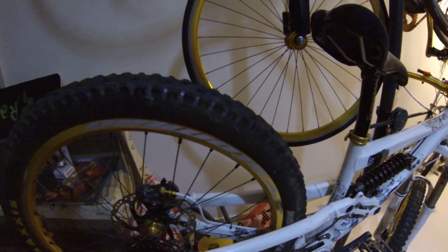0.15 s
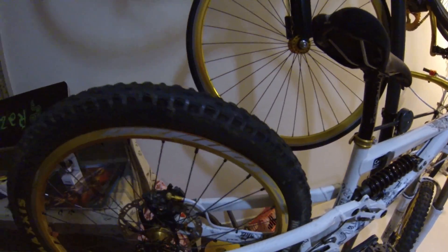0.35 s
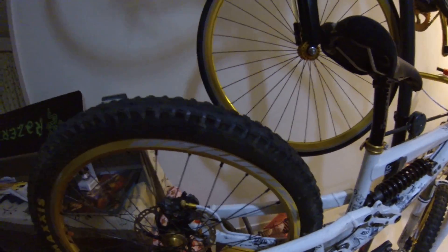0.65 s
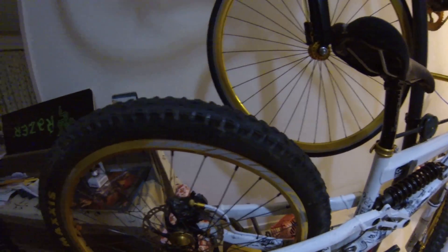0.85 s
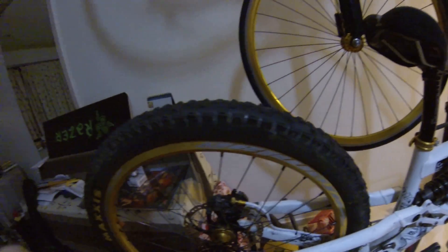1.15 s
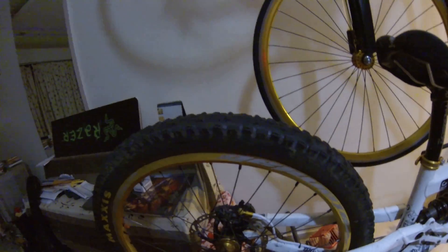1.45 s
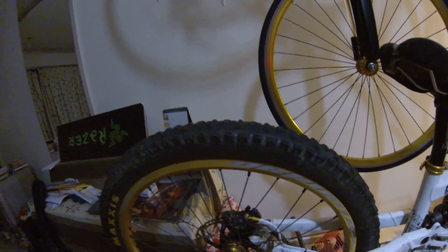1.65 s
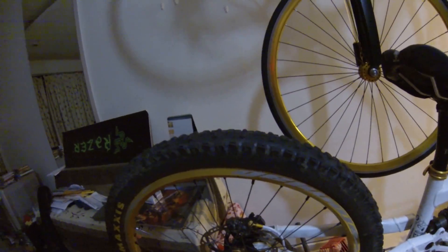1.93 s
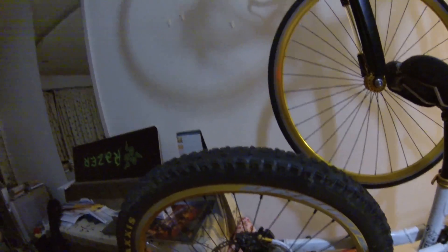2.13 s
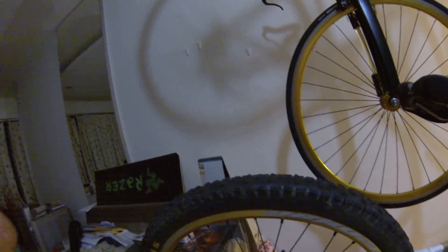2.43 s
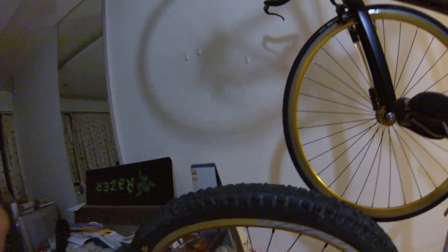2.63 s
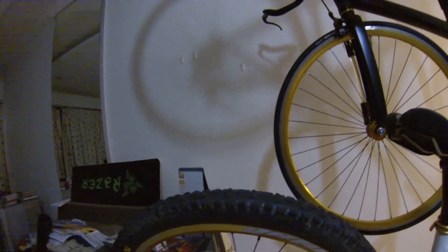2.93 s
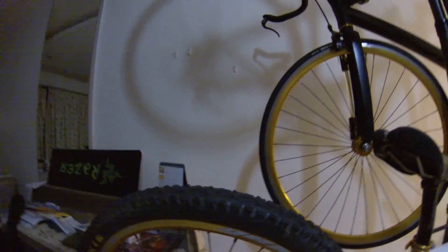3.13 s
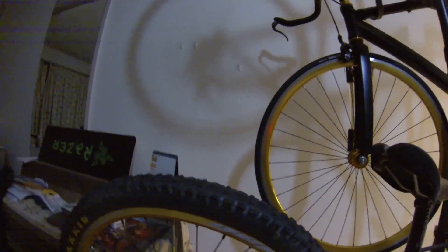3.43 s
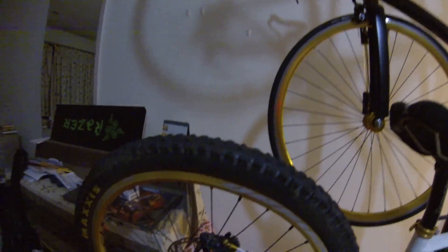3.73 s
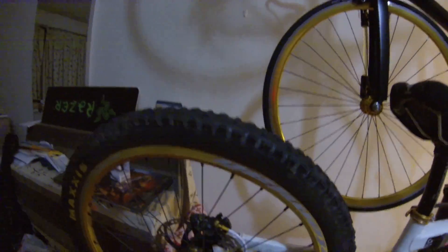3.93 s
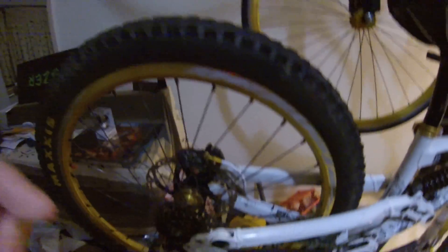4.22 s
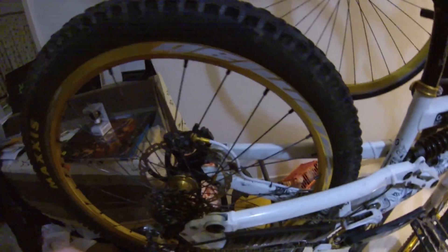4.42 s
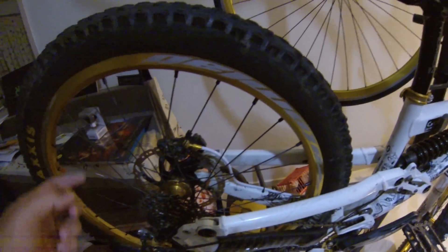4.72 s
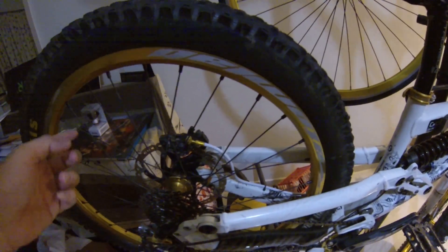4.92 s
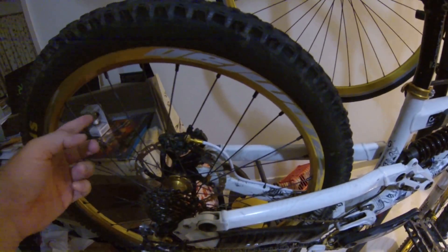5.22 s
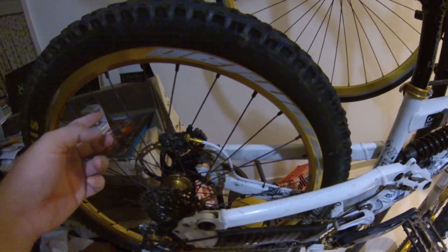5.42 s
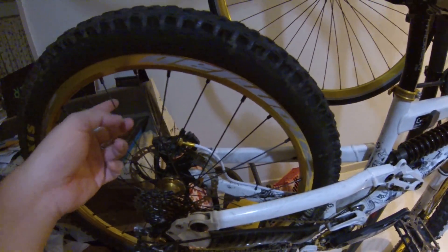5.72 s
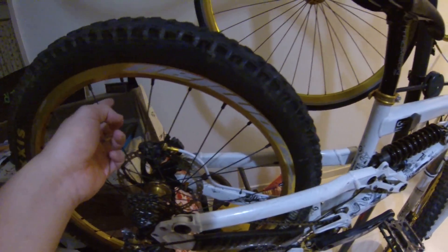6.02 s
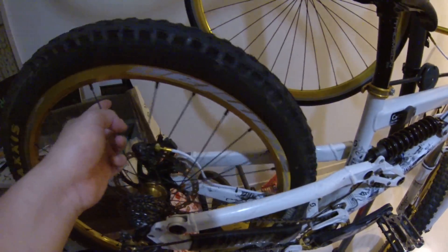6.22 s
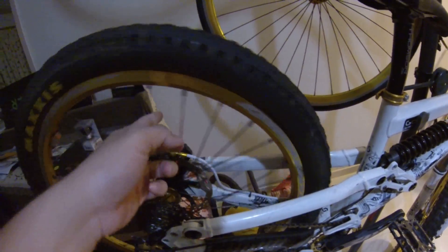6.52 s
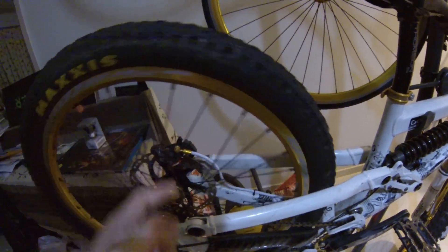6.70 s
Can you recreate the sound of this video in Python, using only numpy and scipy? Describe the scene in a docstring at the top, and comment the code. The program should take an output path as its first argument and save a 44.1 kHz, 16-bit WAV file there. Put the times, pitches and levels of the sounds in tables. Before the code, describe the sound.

A low room rumble and faint microphone hiss open the scene. A creeping bicycle wheel gives one metallic hub click at the start and a quick pair near 1.2 seconds, when a thin, very faint electrical pipping joins. Fingers softly knock and rub on the microphone housing from 0.3 seconds, with a stronger dull bump at 1.3. Sharper plastic knocks and scrapes cluster between 2.6 and 3.3 seconds, followed by a hard knock with a low thump at 3.6 and lighter taps near 4. At about 4.4 seconds a very loud electrical pop cuts the sound out, and a second pop follows at 4.5 as another microphone is plugged in. Rumble and slightly brighter hiss swell back by 5.4 seconds. From 6.3 to 6.8 seconds the hub gives four crisp, evenly spaced clicks, each ringing briefly in the small room.

```python
"""Slow bicycle wheel and a microphone swap

A bicycle stands upside down in a small room. Its rear wheel creeps round, and the pawls (small catches
in the hub) click down one tooth at a time. Fingers knock and rub on the camera. The sound cuts out
with two pops as a brighter microphone is plugged in, and four evenly spaced clicks follow."""
import sys
import numpy as np
from scipy import signal
from scipy.fft import rfft, irfft
from scipy.io import wavfile

SR = 44100
rng = np.random.default_rng(int(sys.argv[2]) if len(sys.argv) > 2 else 0)


def inscribe(sig):
    """Save sig as 16-bit PCM at rate SR to the path in sys.argv[1].

    A 1-D sig is mono; a 2-D sig holds one channel per row.
    Samples are clipped to [-1, 1] before scaling.
    """
    pcm = np.round(np.clip(np.atleast_2d(sig).T, -1, 1) * 32767)
    wavfile.write(sys.argv[1], SR, pcm.astype(np.int16))


N = 302526
TIME = np.arange(N) / SR
SIZE = 4096   # samples in one short sound
HZ = np.maximum(np.fft.rfftfreq(SIZE, 1 / SR), 1)
# The camera mutes its own microphone, shuts the input, then opens it for the plug-in one.
MUTE_S, SHUT_S, UNMUTE_S = 4.346, 4.393, 4.511


def from_db(db):
    """Turns decibels into a factor to multiply by."""
    return 10 ** (np.asarray(db) / 20)


def at_hz(points, hz):
    """Reads between rows of frequency and value, with octaves evenly spaced."""
    where, value = np.transpose(points)
    return np.interp(np.log(np.maximum(hz, 1)), np.log(where), value)


def add(out, s, sound):
    """Mixes a sound in, starting at s seconds."""
    start = max(int(round(s * SR)), 0)
    out[start:start + len(sound)] += sound[:N - start]


def noise(spectrum):
    """Steady noise of a given tone colour, with an average power of 1."""
    gain = from_db(at_hz(spectrum, np.fft.rfftfreq(N, 1 / SR)))
    x = irfft(rfft(rng.standard_normal(N)) * gain, N)
    return x / x.std()


def resonances(modes, spread_db=0):
    """Peaks and dips in dB where a body rings well or badly; spread_db varies them at random."""
    power = 0
    for hz, width, db in modes:
        height = from_db(db + spread_db * rng.normal()) ** 2 - 1
        power += height / (1 + (2 * (HZ - hz) / width) ** 2)
    return 10 * np.log10(np.maximum(1 + power, .1))


def ring(force, response_db):
    """A force shakes a body, which rings with the given tone colour."""
    cepstrum = irfft(np.log(from_db(response_db)))
    # Folding this in half makes the ringing follow the blow, never lead it.
    cepstrum[1:SIZE // 2] *= 2
    cepstrum[SIZE // 2 + 1:] = 0
    return signal.fftconvolve(force, irfft(np.exp(rfft(cepstrum))))


def swings(modes):
    """Pure tones fade after a blow; t60 is the seconds each takes to fall 60 dB."""
    t = np.arange(2 * SIZE) / SR
    return sum(from_db(db - 60 * t / t60) * np.sin(2 * np.pi * hz * t) for hz, db, t60 in modes)


def chatter(hold_s, t60, passes):
    """The force of two touching parts that rattle for a moment, then settle."""
    envelope = from_db(-60 * np.maximum(np.arange(SIZE) / SR - hold_s, 0) / t60)
    force = rng.standard_normal(SIZE) * envelope
    for _ in range(passes):   # even out the strength of all frequencies
        force = irfft(np.exp(1j * np.angle(rfft(force)))) * np.sqrt(envelope)
    return force / np.linalg.norm(force)


def built_in_background(pip_hz=5600, pip_every_s=.25, pip_at_s=1.98, pip_half_s=.0074, top_from_s=1.23):
    """The room and held camera rumble and its microphone hisses; thin hiss and electrical pips join."""
    # Each row of all three: frequency in Hz, relative level in dB.
    rumble = [(12, -19.5), (22, 0.5), (45, 0), (100, -10.5), (190, -12.5), (300, -18.5), (600, -26),
              (900, -25), (1500, -32), (3000, -40.5), (6000, -66.5)]
    hiss = [(1500, -6), (2500, 5.5), (4800, 2.5), (5080, 11), (5300, 3), (6000, 0.5), (9000, -2.5),
            (12500, -6), (15000, -6)]
    top_hiss = [(6000, -27.5), (11200, -13), (12200, -5.5), (13000, -8.5), (14500, -4), (15200, -1)]
    from_pip_s = (TIME - pip_at_s + pip_every_s / 2) % pip_every_s - pip_every_s / 2
    pips = from_db(-68.5) * np.exp(-(from_pip_s / pip_half_s) ** 2) * np.sin(2 * np.pi * pip_hz * TIME)
    steady = from_db(-46.5) * noise(rumble) + from_db(-67) * noise(hiss)
    top = from_db(-67.5) * noise(top_hiss) + pips
    return (steady + top * (TIME > top_from_s)) * (TIME < MUTE_S)


def plug_in_background(wake_from_s=4.72, wake_until_s=5.36):
    """Rumble and hiss swell as the plug-in microphone slowly wakes up."""
    # Each row of both: frequency in Hz, relative level in dB.
    rumble = [(20, -1), (45, 1), (80, -15), (190, -15), (300, -21), (600, -29.5), (1200, -35),
              (3000, -44.5), (6000, -50)]
    hiss = [(1500, 3.5), (3000, 0), (4850, -2), (5060, 4.5), (5300, -0.5), (7000, -1.5), (13000, -1.5),
            (15000, 1), (15400, -6)]
    asleep = np.interp(TIME, [wake_from_s, wake_until_s], [1, 0])
    out = from_db(-48.5 - 9.5 * asleep) * noise(rumble)
    out += from_db(-69.5 - 15.5 * asleep) * noise(hiss)
    return out * (TIME > UNMUTE_S)


def supply_offset():
    """The plug-in microphone's power supply slowly pushes the signal away from zero."""
    # Each row: time in seconds, left offset, right offset (1 is full scale).
    offsets = [(4.52, 0, 0), (4.61, .046, .042), (4.85, .054, .049), (5.2, .1, .088), (5.52, .17, .112),
               (6.86, .147, .088)]
    s, left, right = np.transpose(offsets)
    return np.array([np.interp(TIME, s, left), np.interp(TIME, s, right)])


def room(size=22050, build_s=.0024):
    """A wash of echoes from the walls, dying faster in the treble."""
    # Each row: frequency in Hz, seconds to fade by 60 dB.
    fade_times = [(500, 0.4), (1500, 0.38), (3000, 0.38), (5000, 0.39), (8000, 0.38), (14000, 0.26)]
    # Each row: frequency in Hz, relative level in dB.
    colour = [(300, 9.5), (1700, 6), (3000, 0.5), (5000, 3.5), (8000, -2.5), (15000, -1)]
    t, hz = np.arange(size) / SR, np.fft.rfftfreq(size, 1 / SR)
    spectrum = rfft(rng.standard_normal(size)) * from_db(at_hz(colour, hz))
    centres, t60s = np.transpose(fade_times)
    out = np.zeros(size)
    for share, t60 in zip(np.eye(len(centres)), t60s):
        band = irfft(spectrum * np.interp(hz, centres, share), size)
        out += band * from_db(-60 * t / t60) * np.sqrt(2 * np.log(1000) / (t60 * SR))
    return out * (1 - np.exp(-t / build_s))


def case_db(crack_db, sizzle_db, spot_hz, limp_hz=1010):
    """The camera case's tone: a limp spot thuds, a nail cracks and sizzles, each spot sounds hollow."""
    # Each row: frequency in Hz, width in Hz, peak or dip in dB.
    case_modes = [(300, 98, 5.5), (450, 26, 4.5), (570, 190, -14.5), (790, 100, 5.5), (1023, 39, 4),
                  (1236, 67, 6.5), (1700, 210, 4.5), (2060, 260, -20), (2475, 220, 11), (2900, 200, -16.5),
                  (3260, 220, 4.5), (4360, 360, -11), (4900, 410, 4.5), (6126, 400, -9), (6250, 350, 1.5)]
    thud_db = 1 + 6 * max(np.log2(limp_hz / spot_hz), 0)   # lower spots are limper
    top_db = crack_db + sizzle_db
    touch = [(50, thud_db - 9), (150, thud_db - 8), (280, thud_db), (480, thud_db - 1.5),
             (750, -.6), (1750, -2.2), (2450, crack_db / 2 - 6.5), (3100, crack_db + .5),
             (6400, crack_db - 1), (7200, top_db + 2), (12500, top_db), (15000, top_db - 5.5)]
    hollow_note = resonances([(spot_hz, .23 * spot_hz, 9.5)])
    return at_hz(touch, HZ) + resonances(case_modes) + hollow_note - 4.5


def rubs(gain_db=12, sizzle_db=-16, grain_db=3.5):
    """Skin sticks and slips on the case in fine grains, swelling and fading."""
    # Each row: middle and half length in seconds, relative level and crack in dB, spot pitch in Hz.
    slides = [(0.389, 0.032, -43, -15, 694), (0.694, 0.077, -52.5, -16.5, 950),
              (1.285, 0.028, -40.5, -36, 1200), (1.331, 0.021, -42.5, -18, 690),
              (1.951, .015, -51, -31, 1000), (2.806, 0.028, -41.5, -16, 1400),
              (2.979, 0.051, -48, -22, 970), (3.044, .016, -38, -20, 990), (3.085, 0.034, -41.5, -8, 880),
              (3.272, .009, -37, -8.5, 600), (3.377, 0.029, -55.5, -7.5, 447),
              (3.576, 0.005, -26, -9, 1380), (3.966, .014, -51.5, -9.5, 800),
              (4.041, 0.034, -53, -5.5, 1900)]
    out = np.zeros(N)
    for s, half_s, level_db, crack_db, spot_hz in slides:
        t = np.arange(-2 * half_s, 2 * half_s, 1 / SR)
        slips = np.interp(t, np.arange(-.2, .2, .002), rng.standard_normal(200))
        force = rng.standard_normal(N)[:len(t)] * from_db(grain_db * slips) * np.exp(-(t / half_s) ** 2)
        damping_db = resonances([(1900, 1200, -3.5)])   # the resting finger damps the wall
        tone_db = damping_db + case_db(crack_db, sizzle_db, spot_hz)
        add(out, s - 2 * half_s, ring(force, level_db + gain_db + tone_db))
    return out


def thumps():
    """A hard press pushes the case wall in, and it swings back a few times."""
    # Each row: start in seconds, level in dB.
    presses = [(2.633, -33), (2.831, -28.5), (3.279, -31), (3.5768, -15.5)]
    # Each row: pitch in Hz, relative level in dB, seconds to fade by 60 dB.
    wall_modes = [(45, 1, .1), (117, -3, .04)]
    out = np.zeros(N)
    for s, db in presses:
        add(out, s, -from_db(db) * swings(wall_modes))
    return out


def knocks(t60=.013, tail_db=-19, tail_t60=.072, dull_db=-9, sizzle_db=-18):
    """Fingers strike the case, which rattles on, duller, while the camera's parts ring faintly."""
    # Each row: start in seconds, relative level in dB, crack in dB (-40 is a soft fingertip,
    # 0 a nail on plastic), pitch of the struck spot in Hz.
    blows = [(0.3332, -4, -13.5, 1400), (0.3629, -5, -24, 430), (0.3974, -4, -32, 405),
             (0.5715, -9.5, -42, 806), (0.594, -10.5, -30, 377), (0.6668, -4, -50, 900),
             (0.7343, -1.5, -52, 1260), (0.9979, -11, -44, 920), (1.3087, 10, -36, 380),
             (1.3106, 13, -46, 1080), (1.3265, 7, -39, 1190), (2.6224, 4.5, -30, 970),
             (2.6274, 8, -28.5, 715), (2.6426, -4.5, -23, 600), (2.7807, 13.5, -9, 2580),
             (2.7873, 1, -7, 1590), (2.7982, 5.5, -0.5, 2540), (2.8104, 11, 2, 2380), (2.827, 10, -5, 790),
             (2.8536, -2.5, -40, 760), (2.9024, -0.5, -9, 550), (2.9046, 12.5, -3, 4600),
             (3.0541, -3.5, -7.5, 312), (3.2712, 0, -5, 480), (3.3483, -8.5, -7.5, 470),
             (3.5692, -3, -4, 279), (3.5816, 17.5, -1, 1460), (3.853, -12.5, -15, 600),
             (4.0408, 0, -7.5, 2300), (4.044, -2.5, -8, 2010)]
    # Each row: pitch in Hz, relative level in dB, seconds to fade by 60 dB.
    after_ring = [(1307, -64, .08), (2544, -66, .13), (2903, -66, .15), (12540, -33, .025)]
    out = np.zeros(N)
    for s, level_db, crack_db, spot_hz in blows:
        contact_s = .0016 * 2 ** (-level_db / 7)   # a blow 7 dB stronger is half as long
        blow = chatter(contact_s, t60, passes=3)
        add(out, s, ring(blow, level_db + case_db(crack_db, sizzle_db, spot_hz)))
        rattle = chatter(contact_s, tail_t60, passes=1)
        add(out, s, ring(rattle, level_db + tail_db + case_db(crack_db + dull_db, sizzle_db, spot_hz)))
    return out + signal.fftconvolve(out, swings(after_ring))[:N]


def plug_pops(capacitor_s=.0089, step_db=-23, settle_s=.0041):
    """The plug's contacts throw two electrical pulses; a small step follows as the input opens."""
    # Each row: start and length in seconds, height (1 is full scale), rise and fall in seconds.
    left = [(4.36208, .0008, -1.08, .0001, .0001), (4.5003, .0003, .5, .00001, .00001)]
    right = [(4.36208, .0022, -1.25, .0001, .0006), (4.50066, .00065, .62, .00001, .00001)]
    out, t = np.zeros((2, N)), np.arange(SIZE) / SR
    for channel, contacts in zip(out, (left, right)):
        for s, length_s, height, rise_s, fall_s in contacts:
            pop = np.interp(t, [0, rise_s, length_s, length_s + fall_s], [0, height, height, 0])
            if s <= SHUT_S:   # the input's capacitor adds a tail, cut off when the input shuts
                pop = signal.lfilter([1, -1], [1, -np.exp(-1 / (capacitor_s * SR))], pop)
                pop *= s + t < SHUT_S
            add(channel, s, pop)
        add(channel, UNMUTE_S, -from_db(step_db) * np.exp(-t / settle_s))
    return out


def bounces(length_s, count=4, growth_db=1.5):
    """A pawl hops a few times at uneven intervals before it comes to rest."""
    taps, hop = np.zeros(SIZE // 4), np.arange(count)
    hop_s = length_s * (hop + rng.uniform(-.4, .4, count) * (hop > 0)) / count
    taps[(hop_s * SR).astype(int)] = from_db(growth_db * hop / count) * rng.choice([-1, 1], count)
    return taps / np.linalg.norm(taps)


def pawl_clicks(built_in_room_db=-4, plug_in_room_db=-6.5):
    """Each pawl snaps onto a tooth, bounces and sets hub, sprockets and spokes ringing into the room."""
    # Each row: start in seconds, relative level in dB, bounce length in seconds, boosted pitch in Hz.
    drops = [(0.048, -34.5, .002, 3960), (0.0869, -0.5, .008, 3340), (1.2267, -1.5, 0.0048, 4870),
             (1.25, -8, .003, 8000), (6.3390, 1, .0045, 3390), (6.4964, 1, .0054, 8000),
             (6.6515, 0.5, 0.0042, 1910), (6.8064, 0, .0036, 8100)]
    # The hub's broad tone. Each row: frequency in Hz, relative level in dB.
    hub_colour = [(150, -16), (500, -22), (800, -10), (1200, -14), (1500, 1), (2400, -4.5), (4000, -3),
                  (6800, -1), (7800, 6.5), (12000, 1.5), (15500, 6)]
    # Its ringing notes. Each row: pitch in Hz, width in Hz, dB above the broad tone.
    hub_modes = [(1480, 120, 2.6), (1840, 140, 4), (2800, 73, 7.3), (3396, 220, 9.8), (4670, 170, 3),
                 (5960, 130, 7.5), (7950, 96, 2.5), (8400, 120, 2.8), (9870, 80, 6.6), (10425, 100, 7),
                 (10960, 45, 8), (11517, 45, 7), (12700, 350, 7.5), (14930, 110, 8)]
    # The camera's own microphone. Each row: frequency in Hz, dB compared with the plug-in one.
    built_in = [(400, 9), (1700, 2), (3400, 4.5), (4900, 7.5), (5400, 5), (5900, -7), (6600, 4),
                (7600, -4.5), (9100, 0.5), (10500, -11), (12000, -7.5), (12800, -11), (15300, -20.5)]
    out = np.zeros(N)
    for s, level_db, bounce_s, boost_hz in drops:
        hub_db = at_hz(hub_colour, HZ) + resonances(hub_modes, spread_db=1.7)
        hub_db += resonances([(boost_hz, 240, 4)])
        microphone_db = at_hz(built_in, HZ) if s < MUTE_S else 0
        room_db = built_in_room_db if s < MUTE_S else plug_in_room_db
        snap = ring(chatter(hold_s=.0004, t60=.044, passes=5), hub_db + microphone_db + level_db)
        add(out, s, signal.fftconvolve(snap, bounces(bounce_s)))
        add(out, s, from_db(room_db) * signal.fftconvolve(snap, room()))
    return out


def scene():
    """Both channels carry the same sound, except for the plug's pops and the supply offset."""
    sound = pawl_clicks() + knocks() + rubs() + thumps() + built_in_background() + plug_in_background()
    return sound + plug_pops() + supply_offset()


def record(dry):
    """The camera flattens peaks beyond full scale and cuts the highest treble."""
    low_pass = signal.firwin(201, cutoff=15300, fs=SR, window="blackman")
    return signal.fftconvolve(np.clip(dry, -1, 1), low_pass[None], "same", axes=1)


dry = scene()
out = record(dry)
inscribe(out)
```